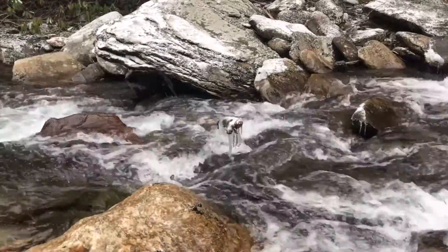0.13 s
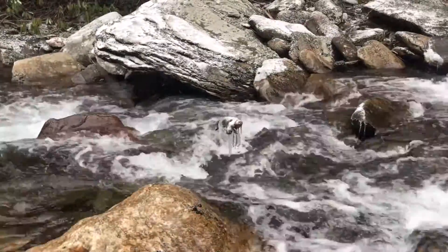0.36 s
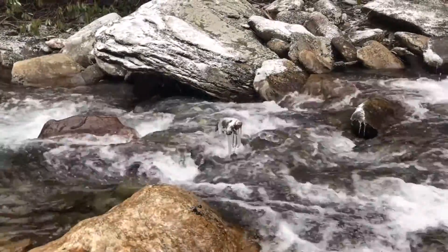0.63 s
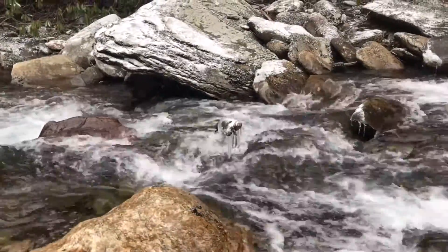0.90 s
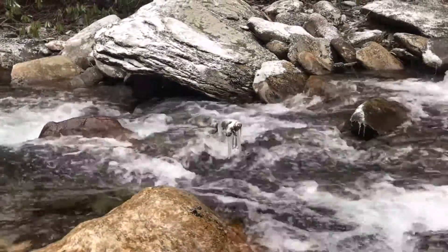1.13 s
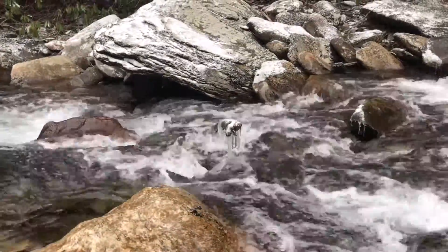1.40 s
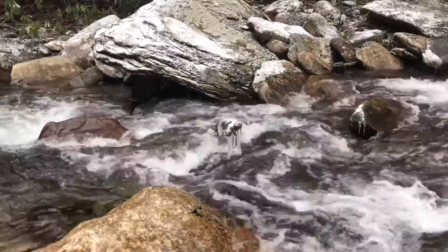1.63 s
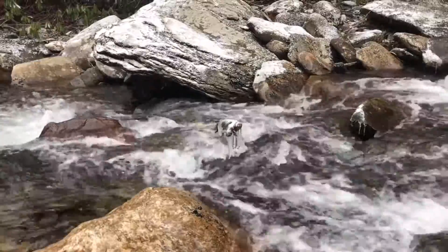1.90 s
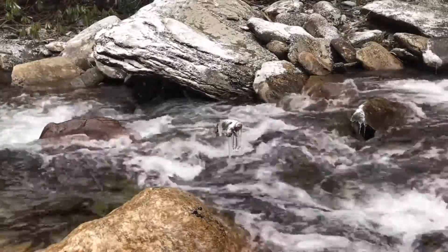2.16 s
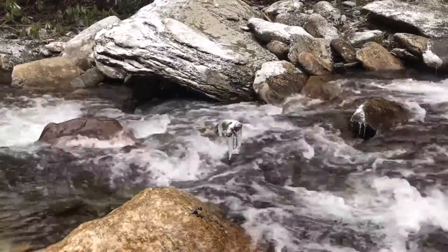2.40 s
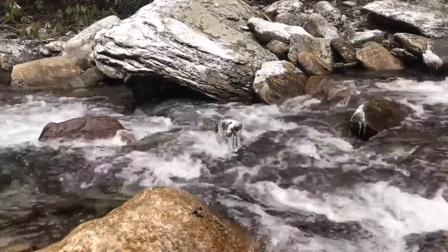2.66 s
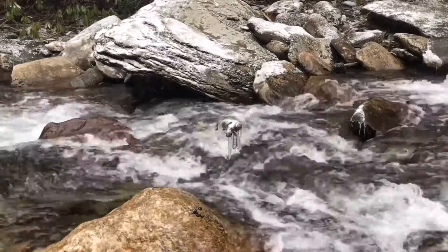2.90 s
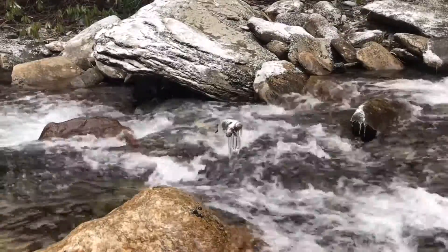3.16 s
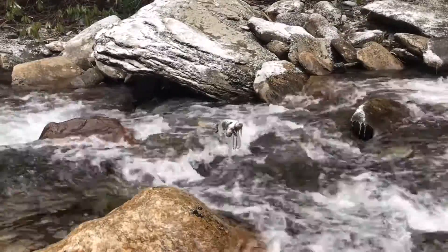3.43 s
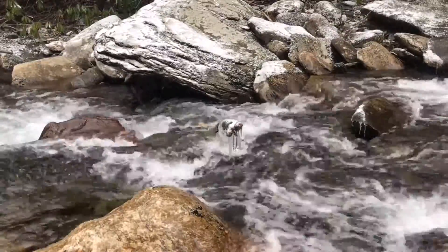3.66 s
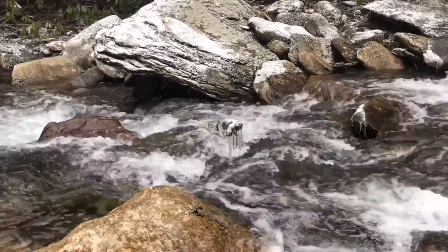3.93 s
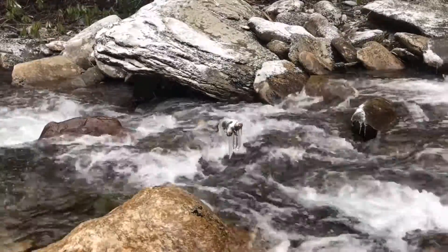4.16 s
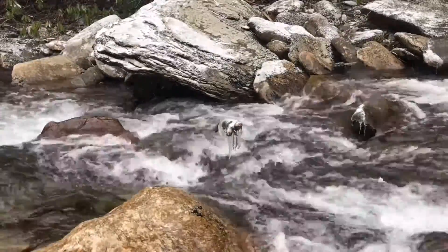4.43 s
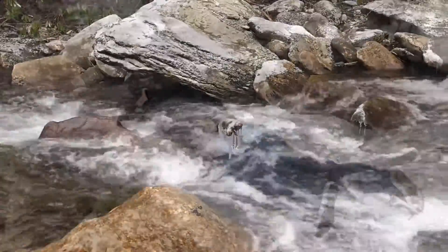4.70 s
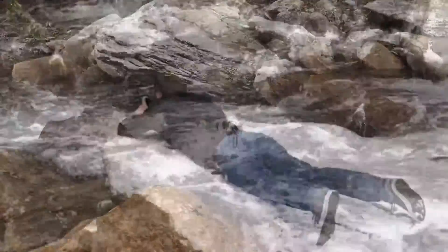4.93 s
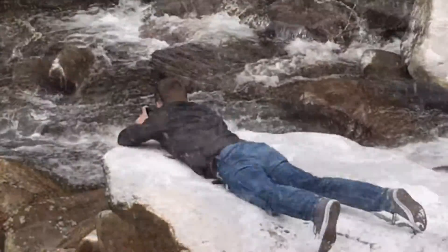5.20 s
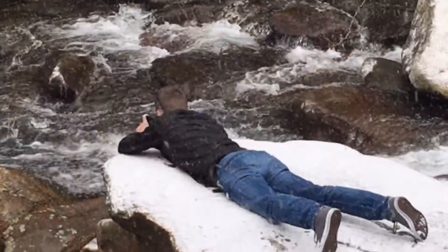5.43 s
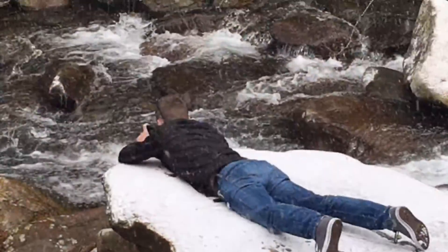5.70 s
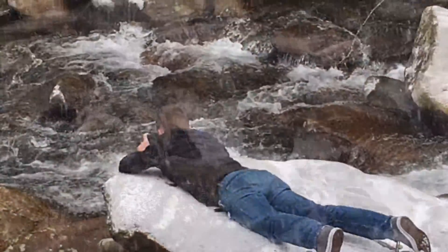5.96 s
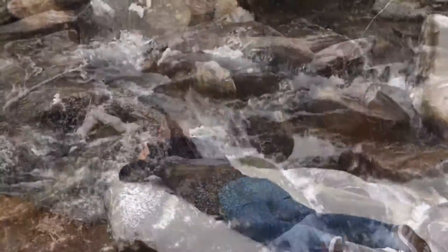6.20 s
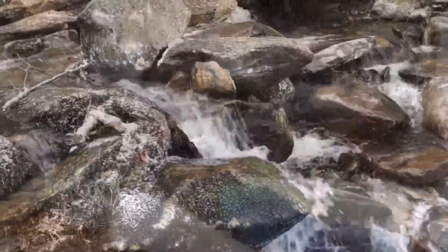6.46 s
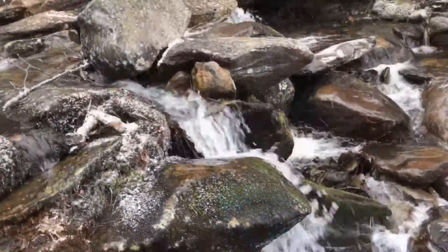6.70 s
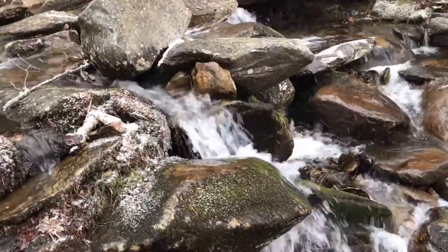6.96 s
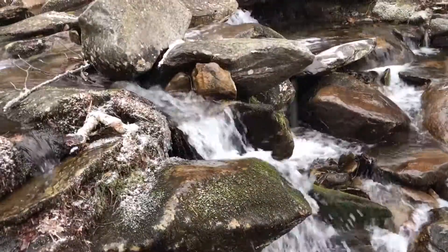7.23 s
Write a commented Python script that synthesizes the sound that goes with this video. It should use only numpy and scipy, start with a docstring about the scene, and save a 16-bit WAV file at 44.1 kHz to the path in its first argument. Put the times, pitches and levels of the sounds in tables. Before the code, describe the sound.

Continuous rapids pour over stones, smooth broad roar behind a crowd of tiny ringing bubbles, with rounded gurgles and sharp plips standing out. The rush fades away over about a second, leaves a third of a second of nothing, then a second stretch of water swells up, similar in loudness but crisper, splashier and more grainy. Close, dry, centred mono sound in open air.

```python
"""A mountain stream rushes over rocks close to a single microphone, fades out to silence,
and a brighter, splashier cascade fades in. The rush layers a crowd of ringing bubbles of trapped air
over the smooth noise roar of water farther off. Drops and gulps stand out as single pitched bubbles,
each with a small spray of others, and the level of the whole mix lifts slightly and briefly at times."""
import sys
import numpy as np
from scipy import signal
from scipy.fft import rfft, irfft, next_fast_len
from scipy.io import wavfile
from scipy.ndimage import uniform_filter1d

SR = 44100
rng = np.random.default_rng(int(sys.argv[2]) if len(sys.argv) > 2 else 0)


def dump(signal):
    """Clip the signal to [-1, 1] and save it as 16-bit WAV at the path in sys.argv[1]."""
    limited = np.clip(np.atleast_2d(signal).T, -1, 1)
    pcm = np.round(limited * 32767).astype(np.int16)
    wavfile.write(sys.argv[1], SR, pcm)


def nominal_scale(level):
    """Amplitude ratio for a level in decibels (scalar or array-like)."""
    x = np.asarray(level, float) / 20
    return 10 ** x


N = 323682  # length [samples]

# tone colour of the broad rapids: (frequency [Hz], relative level per Hz [dB])
RAPIDS_COLOUR = [(25, -34.5), (69, -4.5), (105, -7), (148, 1), (215, -2.5), (320, 1), (445, -2.5),
                 (620, -1.5), (1350, -2.5), (1650, -6), (3200, -7.5), (6050, -15.5), (10400, -24.5),
                 (15500, -21.5)]
# tone colour of the splashier cascade: (frequency [Hz], relative level per Hz [dB])
CASCADE_COLOUR = [(25, -21), (53, -4), (115, -2.5), (145, 0.5), (300, 0), (400, -7.5), (480, -9), (614, -1),
                  (919, 0), (1200, -2.5), (1450, -1), (4380, -6), (6000, -9), (7700, -14.5), (15500, -12.5)]
# balance of near, separate bubbles against the far roar: (frequency [Hz], level [dB])
NEAR_BALANCE = [(100, -9), (400, -5), (1200, -4.5), (3000, -6.5), (6000, -5.5), (14000, -5)]
# narrow dips and bumps of the microphone in its housing: (frequency [Hz], width [Hz], gain [dB])
MIC_RIPPLES = [(4340, 660, 1), (4900, 270, -2.5), (7600, 390, -2), (10330, 730, -3), (11500, 670, 1)]
# editing fader closing on the rapids, straight in amplitude: (time [s], gain [0-1])
FADE_OUT_POINTS = [(4.4, 1), (5.41, 0)]
# editing fader opening on the cascade, straight in amplitude: (time [s], gain [0-1])
FADE_IN_POINTS = [(5.745, 0), (6.75, 0.97)]
# clearest drops smacking the surface, before fader and lifts: (time [s], peak [dB], pitch [Hz])
CLEAR_DROPS = [(.2076, -23, 2570), (.8385, -18, 4020), (1.828, -23, 2620), (3.1226, -18, 3400),
               (3.130, -23, 5700), (3.8248, -24, 3500), (5.9299, -15, 3040), (6.433, -20, 5330),
               (6.679, -21, 3600), (6.8595, -21, 3620), (6.9313, -21, 3500), (7.1097, -18, 2960),
               (7.1813, -23, 3630), (7.3008, -24, 2830)]
# clearest larger bubbles, climbing in pitch as they near the surface, before fader and lifts:
# (time [s], peak [dB], starting pitch [Hz])
CLEAR_GULPS = [(0.049, -20.5, 168.4), (0.319, -17.5, 1340), (1.331, -19, 1170), (2.135, -19, 720),
               (2.925, -21.5, 242), (3.256, -21, 1020), (3.532, -20.5, 606), (3.871, -19, 1170),
               (4.123, -20.5, 1150), (4.195, -22, 590), (6.613, -24.5, 695), (6.803, -18, 1150),
               (6.954, -20, 1250), (7.187, -22, 1360), (7.29, -21, 780)]
# brief small lifts in the level of the whole mix, some set to nothing:
# (time [s], lift [dB], time from the top to 1/e of the lift [s])
LEVEL_LIFTS = [(0.052, 0.5, .06), (.62, 0.5, 0.053), (2.135, 1.5, 0.019), (2.929, 1, .07), (4.24, 0, 0.094),
               (6.613, 0.5, .02), (6.805, 0.5, 0.016), (6.968, 0, .025), (7.11, 1.5, .015),
               (7.19, 1, 0.018), (7.301, 0, 0.015)]

RAPIDS_DB, CASCADE_DB = -23.5, -23.5  # rms of each rush before swell, fader and lifts
RAPIDS_DROPS_PER_S, CASCADE_DROPS_PER_S = 1.5, 6  # lesser drops, thicker in the cascade
LESSER_DROP_DB, LESSER_SPREAD_DB = -25, 1  # middle peak before fader and lifts, and spread either way
LESSER_DROP_HZ = 3300  # middle pitch
TREBLE_EDGE_HZ = 15725  # nothing passes above


def evened(x):
    """Scales to rms 1."""
    return x / np.sqrt(np.mean(x ** 2) + 1e-20)


def read_curve(points, hz):
    """Reads a colour curve on a log-frequency axis."""
    f, value = np.transpose(points)
    return np.interp(np.log(hz + 1), np.log(f + 1), value)


def coloured(x, gain):
    """Filters x by the amplitude gain(hz), with no phase shift."""
    size = next_fast_len(len(x))
    hz = np.fft.rfftfreq(size, 1 / SR)
    return irfft(rfft(x, size) * gain(hz), size)[:len(x)]


def wander(smooth_s):
    """Slow random drift of rms 1: noise averaged twice."""
    size = max(int(smooth_s * SR), 2)
    once = uniform_filter1d(rng.standard_normal(N), size)
    return evened(uniform_filter1d(once, size))


def far_roar(patchy_db):
    """Far water: noise whose level drifts in patches of time and pitch, flat on average."""
    frames = N // 128 + 5
    real, imag, patches = rng.standard_normal((frames, 257, 3)).T
    patches = uniform_filter1d(patches, size=3, axis=0)  # across frequency
    patches = evened(uniform_filter1d(patches, size=10, axis=1))  # across time
    spectrum = (real + 1j * imag) * nominal_scale(patchy_db * patches)
    return evened(signal.istft(spectrum, nperseg=512, noverlap=384)[1][:N])


def bubble(hz, cycles, climb):
    """A pocket of air rings, falls about 20 dB in the given cycles and rises in pitch by climb."""
    u = np.arange(int(3 * cycles * SR / hz) + 4) * hz / SR / cycles
    turns = cycles * (u + climb * u ** 2 / 2)
    onset = (1 - np.exp(-8 * u)) ** 2
    return np.sin(2 * np.pi * turns) * np.exp(-2.3 * u) * onset


def near_bubbles(per_s, spread_db, cycles, climb, clump_db):
    """Near water: bubbles of all sizes, small ones more often, louder in clumps as wavelets break."""
    clumps = nominal_scale(clump_db * wander(0.0056))
    out = np.zeros(N)
    for hz in np.geomspace(120, 14000, 70):
        wait, loud, sign = rng.random((3000, 3)).T
        rate = per_s * (hz / 1000) ** .45
        born = np.cumsum(-np.log(wait + 1e-12)) / rate * SR  # random waits
        strength = np.sign(sign - .5) * nominal_scale(-spread_db * np.log(loud + 0.0048))
        inside = born < N
        births = np.bincount(born[inside].astype(int), strength[inside], N)
        ring = bubble(hz, cycles * (hz / 1000) ** 0.5, climb)  # small bubbles ring more cycles
        ring = ring / np.linalg.norm(ring)
        # equal energy per Hz, whatever the size and number
        out += signal.oaconvolve(births, ring)[:N] * np.sqrt(hz / rate)
    return evened(out * clumps)


def rush(colour, level_db, far, near, swell_db):
    """Far roar and near bubbles share one colour and one gentle random swell."""
    mix = coloured(near, lambda hz: nominal_scale(read_curve(NEAR_BALANCE, hz))) + far

    def colour_gain(hz):
        both = np.sqrt(1 + nominal_scale(2 * read_curve(NEAR_BALANCE, hz)))  # level of far plus near
        return nominal_scale(read_curve(colour, hz)) / both

    mix = coloured(mix, colour_gain)
    return nominal_scale(level_db + swell_db * wander(0.21)) * evened(mix)


def level_lifts(t):
    """Brief small lifts in level: the gain follows a smooth bell around each time in the table."""
    return nominal_scale(sum(db * np.exp(-((t - s) / length) ** 2) for s, db, length in LEVEL_LIFTS))


def sprays(rows, cycles, climb, scatter_s, spread, crowd_db, count):
    """Each event is one clear bubble, then quieter ones of other sizes scattered just after."""
    out = np.zeros(N)
    for s, peak_db, hz in rows:
        for k, (late, size) in enumerate(rng.uniform(-1, 1, (count, 2))):
            other = k > 0  # the first is the clear bubble
            ring = bubble(hz * np.exp(spread * size * other), cycles, climb)
            ring = nominal_scale(peak_db + crowd_db * other) * ring / abs(ring).max()
            start = round((s + scatter_s * abs(late) * other) * SR)
            part = out[start:][:len(ring)]
            part += ring[:len(part)]
    return out


def lesser_drops(start_s, end_s, per_s):
    """Rows of (time [s], peak [dB], pitch [Hz]) for drops that land by chance."""
    when, loud, pitch = rng.random((round((end_s - start_s) * per_s), 3)).T
    times = start_s + (end_s - start_s) * when
    peaks = LESSER_DROP_DB + LESSER_SPREAD_DB * (2 * loud - 1)
    return zip(times, peaks, LESSER_DROP_HZ * np.exp(.25 * (2 * pitch - 1)))


def drops(cut_s):
    """Drops smack the surface: short high rings, clear ones and chance ones, each with a spray."""
    rows = [*CLEAR_DROPS, *lesser_drops(0, cut_s, RAPIDS_DROPS_PER_S),
            *lesser_drops(cut_s, N / SR, CASCADE_DROPS_PER_S)]
    return sprays(rows, cycles=7.5, climb=0.082, scatter_s=.003, spread=.6, crowd_db=-6.5, count=7)


def gulps():
    """Larger bubbles gulp: lower rings whose pitch climbs more as they near the surface."""
    return sprays(CLEAR_GULPS, cycles=7.6, climb=0.23, scatter_s=.012, spread=0.4, crowd_db=-8.0, count=3)


def scene():
    """Two stretches of the stream, one fading out and the other fading in."""
    t = np.arange(N) / SR
    cut_s = FADE_IN_POINTS[0][0]
    bubbles = near_bubbles(per_s=40, spread_db=1.93, cycles=10.2, climb=.1, clump_db=1.14)
    rapids = rush(RAPIDS_COLOUR, RAPIDS_DB, far_roar(1.03), bubbles, swell_db=0.13)
    bubbles = near_bubbles(per_s=40, spread_db=2.45, cycles=9.9, climb=.1, clump_db=2.3)
    cascade = rush(CASCADE_COLOUR, CASCADE_DB, far_roar(0.87), bubbles, swell_db=0.18)
    standouts = drops(cut_s) + gulps()
    mix = (rapids + standouts) * np.interp(t, *np.transpose(FADE_OUT_POINTS))
    mix = mix + (cascade + standouts) * np.interp(t, *np.transpose(FADE_IN_POINTS))
    mix = mix * level_lifts(t)
    return np.array([mix, mix])


def band_limit(x):
    """A steep low-pass at the top of the band."""
    return signal.sosfilt(signal.butter(12, 15830, fs=SR, output="sos"), x)


def record(dry):
    """One microphone with narrow treble dips and bumps; the top is cut off steeply, on both channels."""
    def finish_gain(hz):
        ripples = nominal_scale(sum(db * np.exp(-((hz - f) / width) ** 2) for f, width, db in MIC_RIPPLES))
        top_cut = np.clip((TREBLE_EDGE_HZ - hz) / 20, 0, 1)
        return ripples * top_cut

    mono = coloured(dry[0], finish_gain)
    fader_open = uniform_filter1d(abs(dry[0]), size=200) > 1e-9
    mono = mono * fader_open  # the closed fader is silent
    return band_limit(np.array([mono, mono]))


dry = scene()
out = record(dry)
dump(out)
```